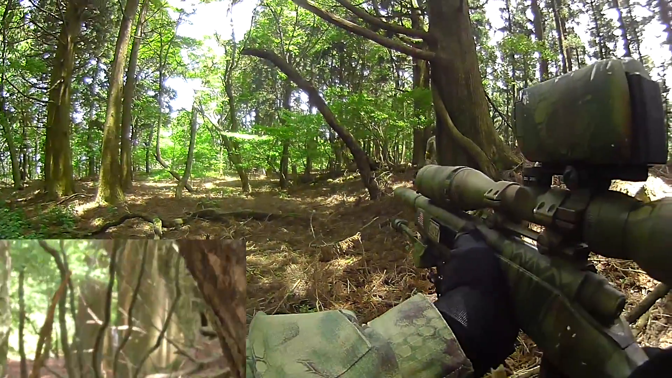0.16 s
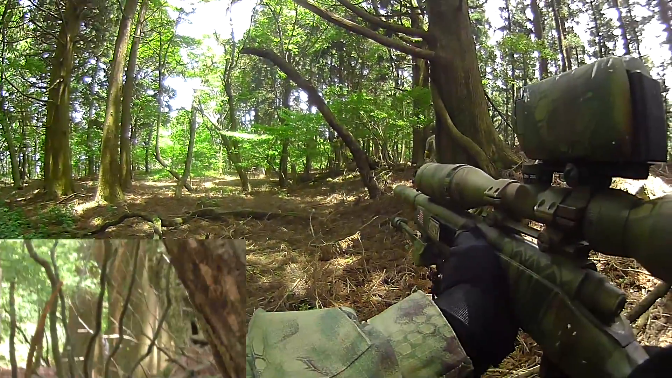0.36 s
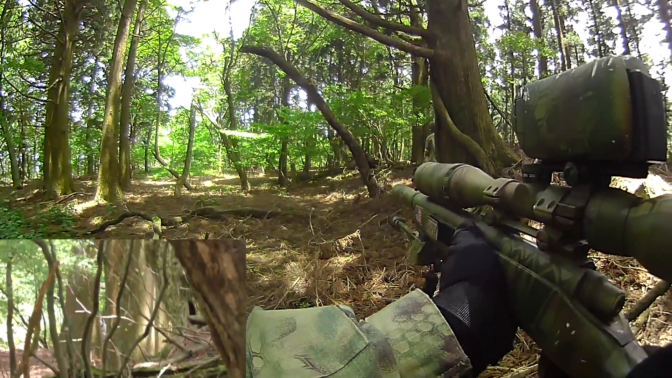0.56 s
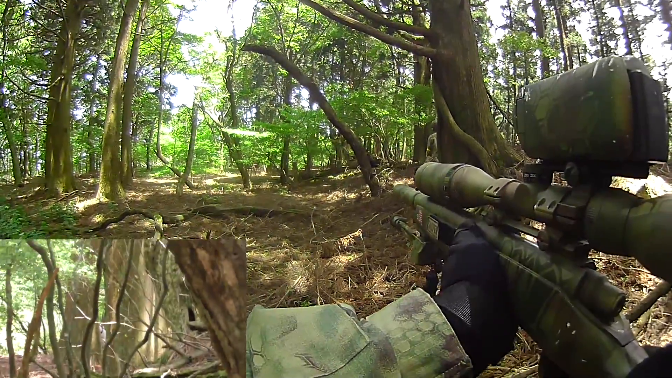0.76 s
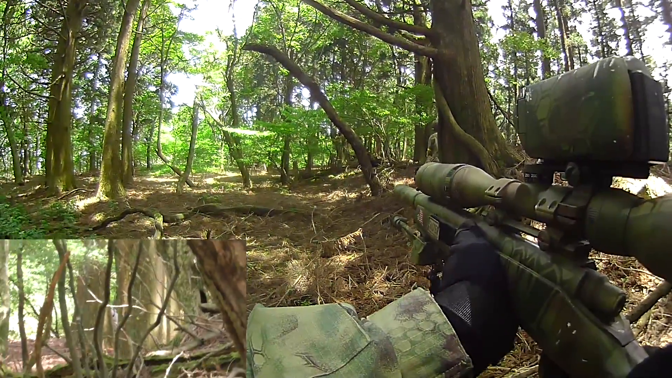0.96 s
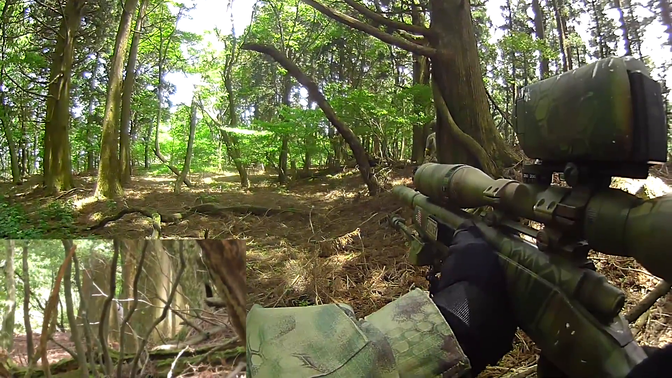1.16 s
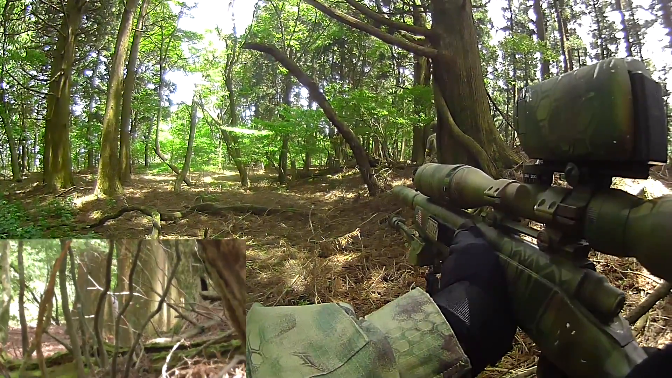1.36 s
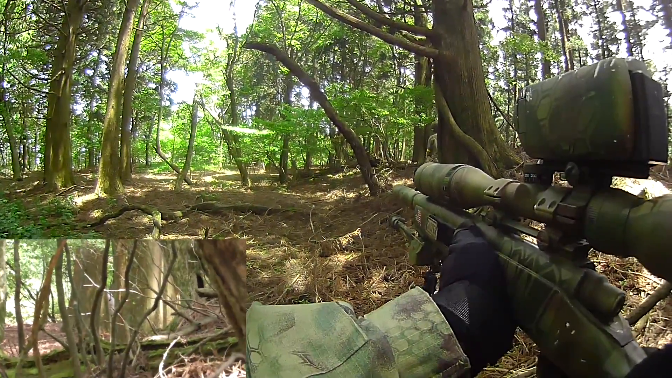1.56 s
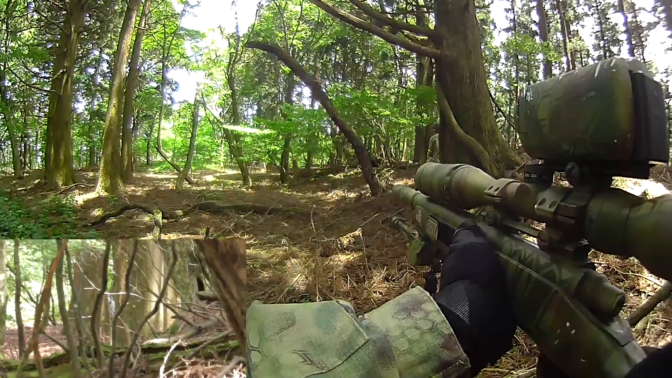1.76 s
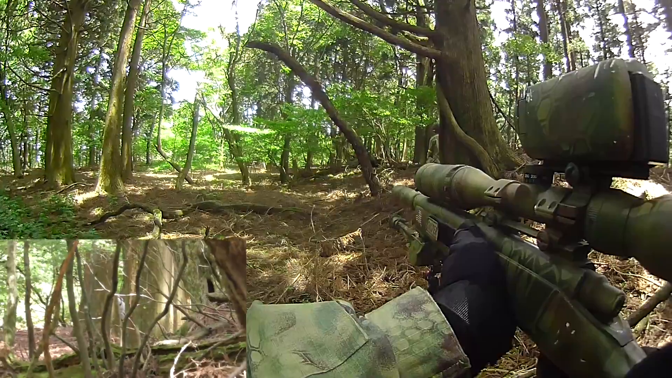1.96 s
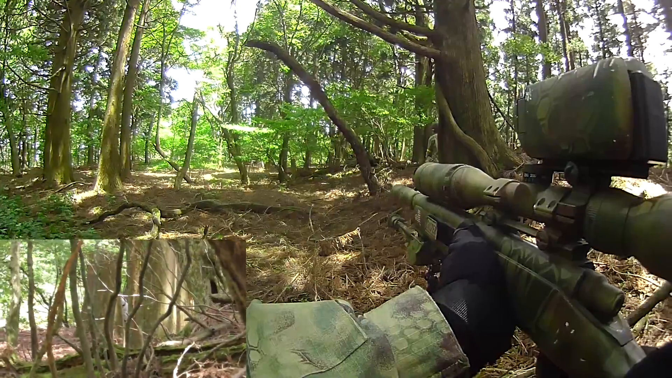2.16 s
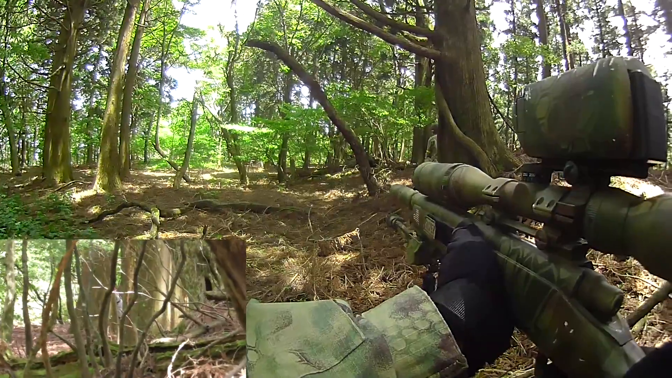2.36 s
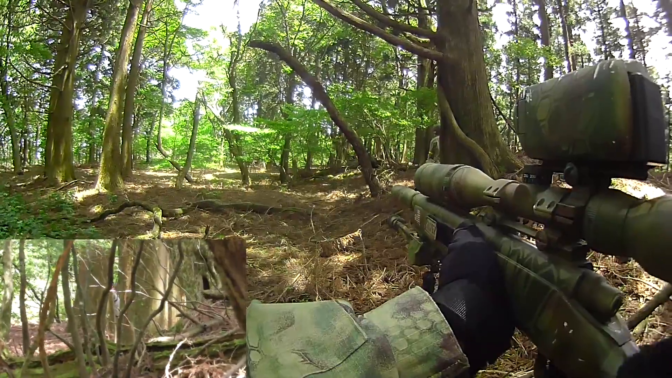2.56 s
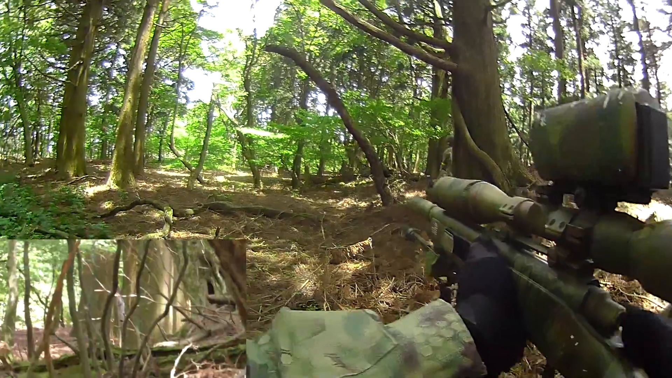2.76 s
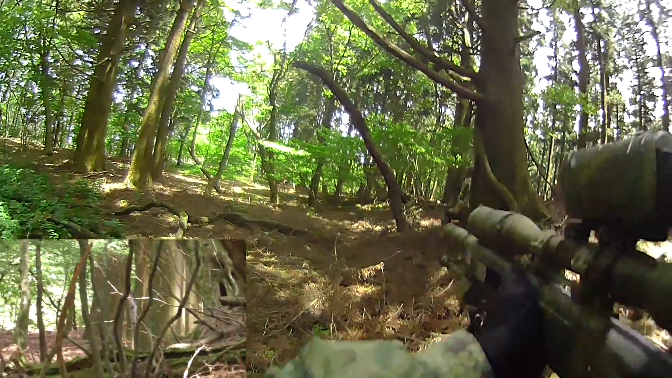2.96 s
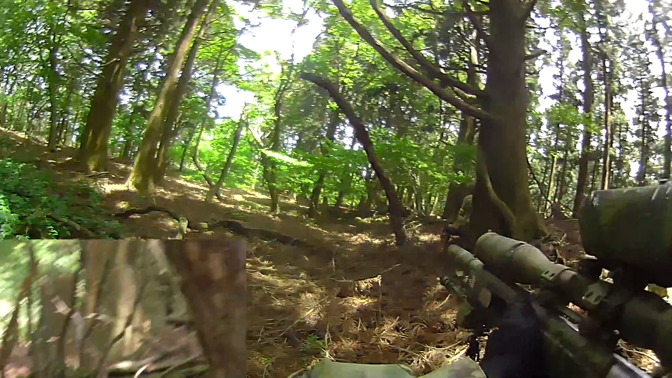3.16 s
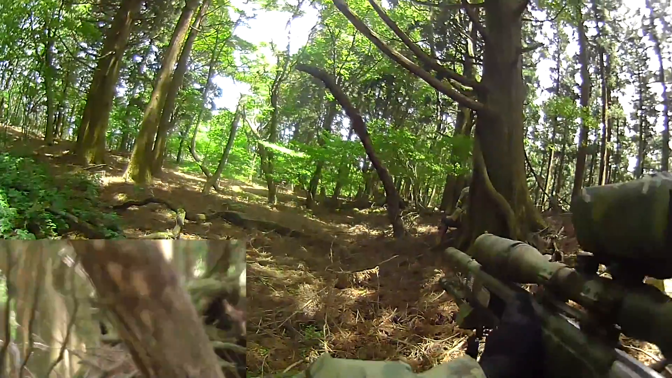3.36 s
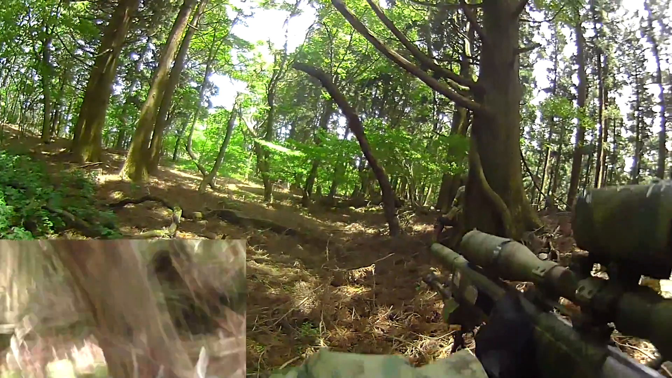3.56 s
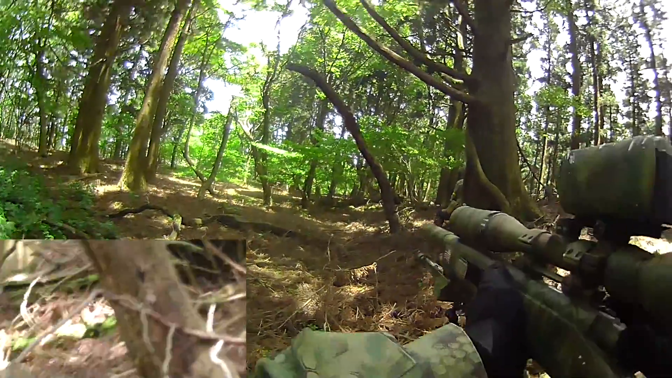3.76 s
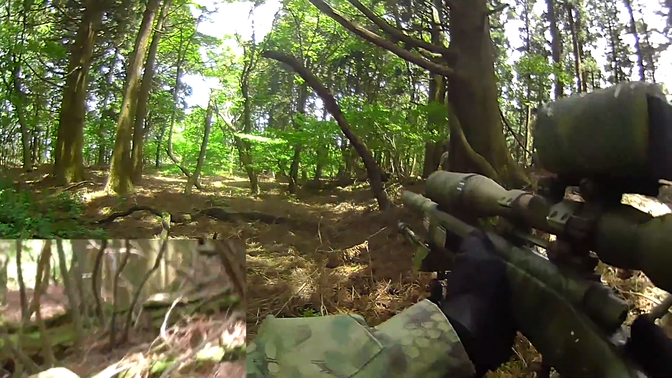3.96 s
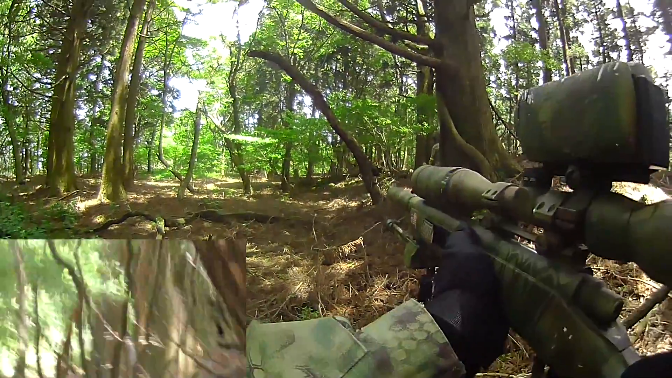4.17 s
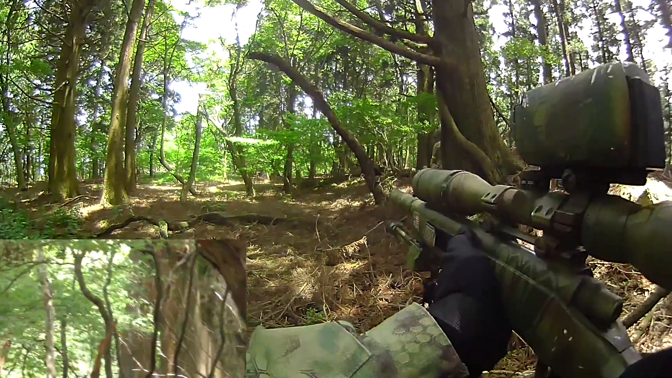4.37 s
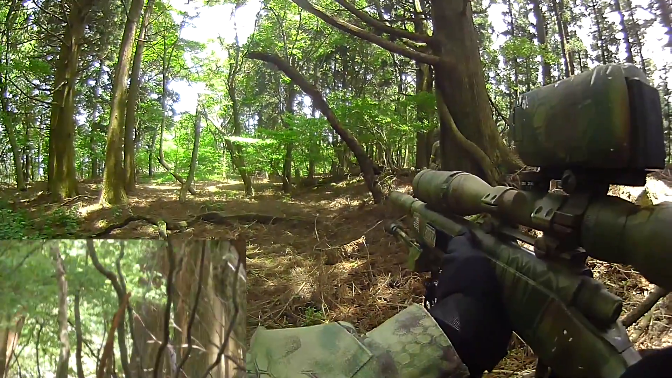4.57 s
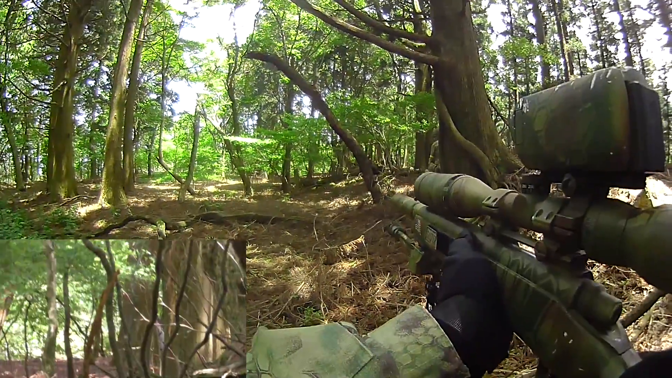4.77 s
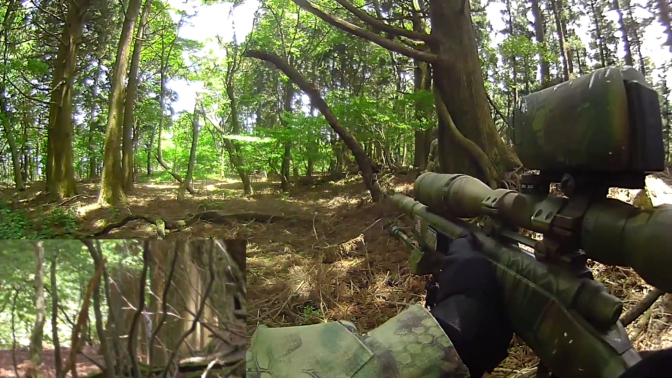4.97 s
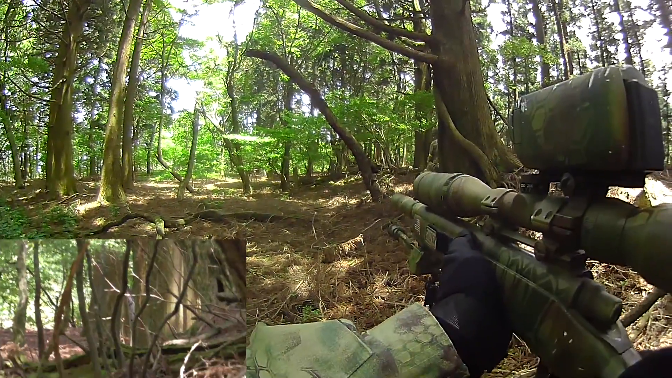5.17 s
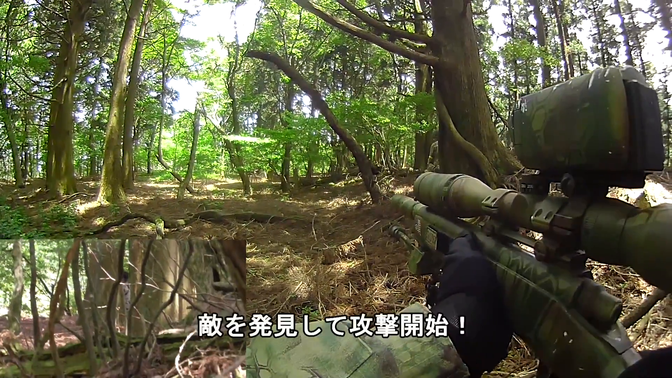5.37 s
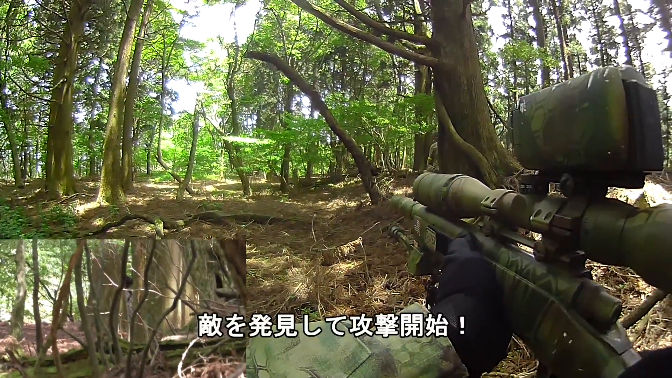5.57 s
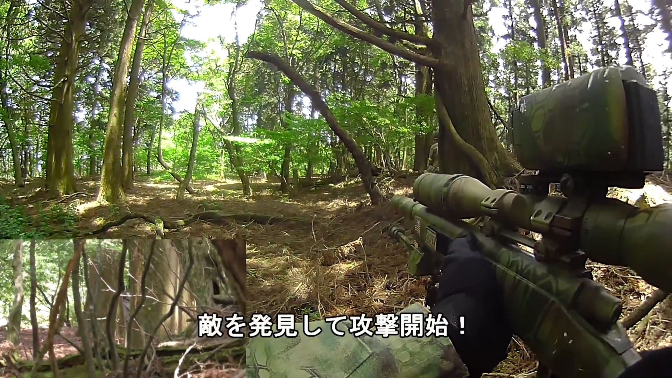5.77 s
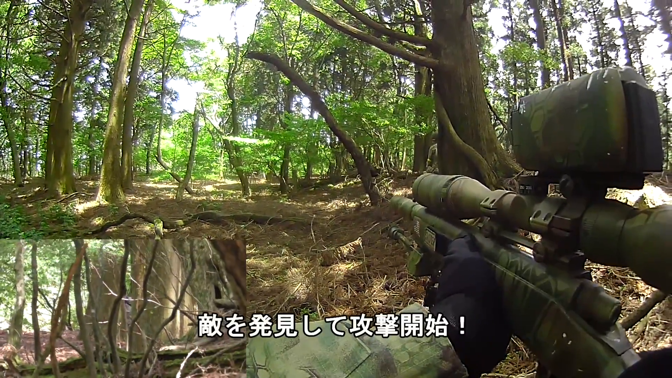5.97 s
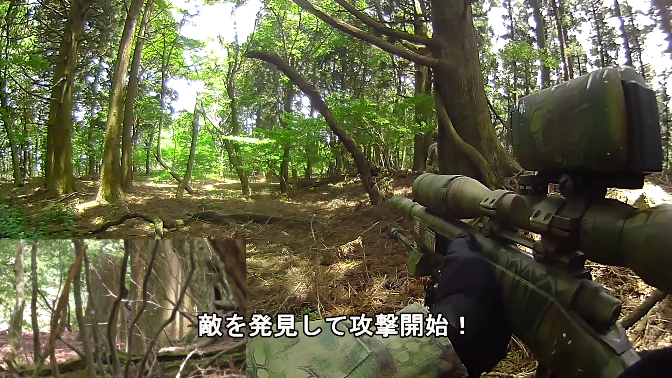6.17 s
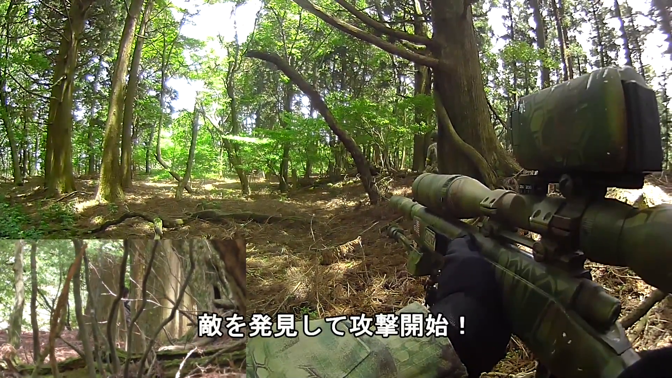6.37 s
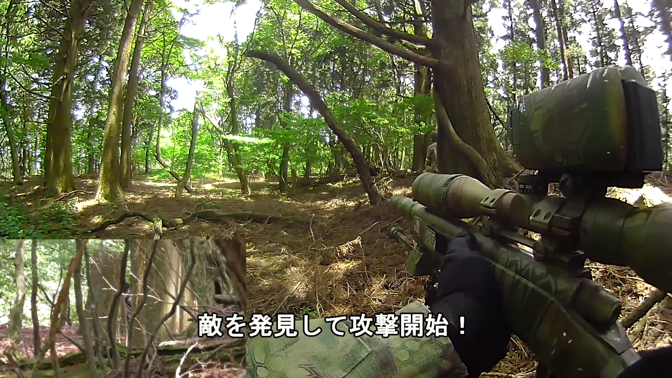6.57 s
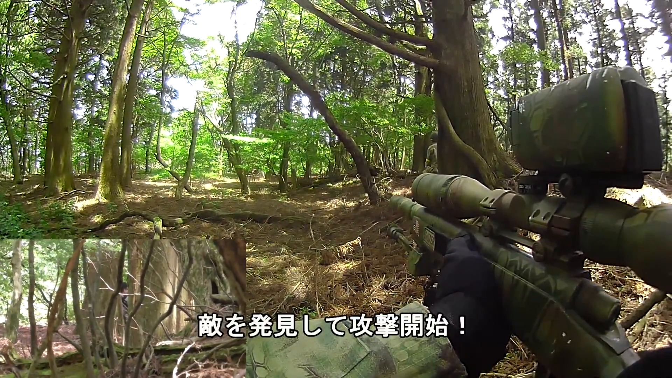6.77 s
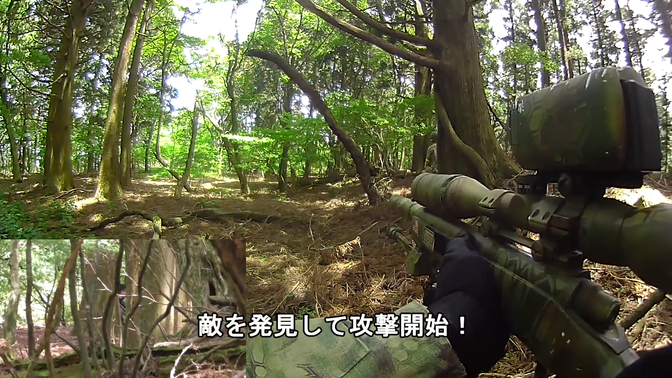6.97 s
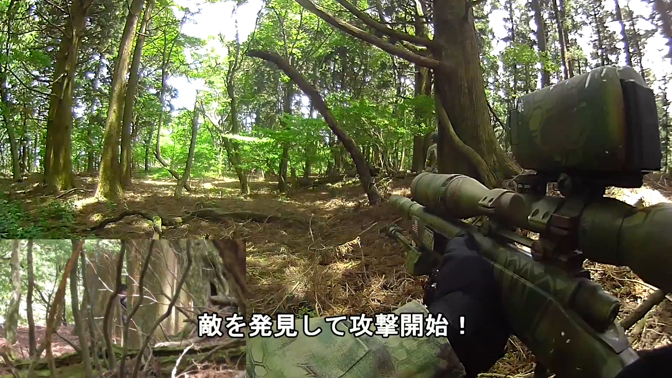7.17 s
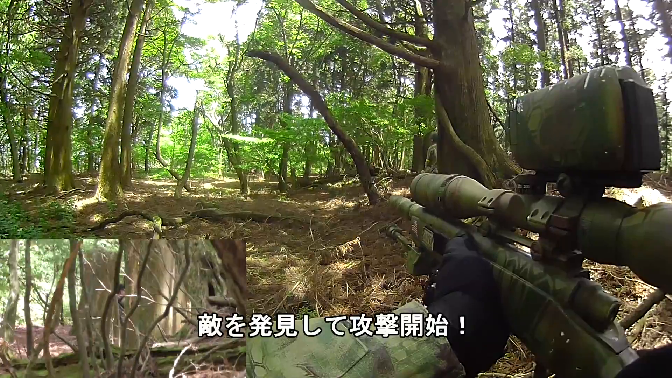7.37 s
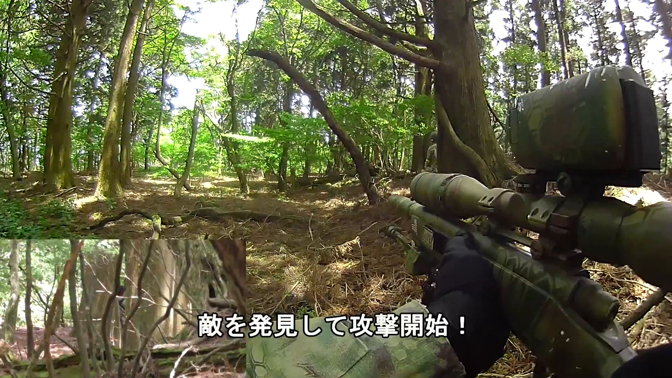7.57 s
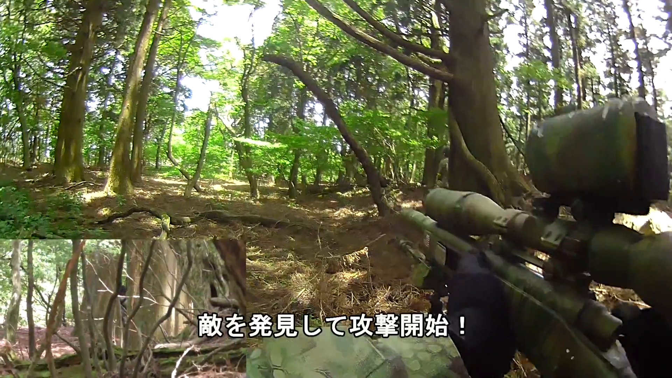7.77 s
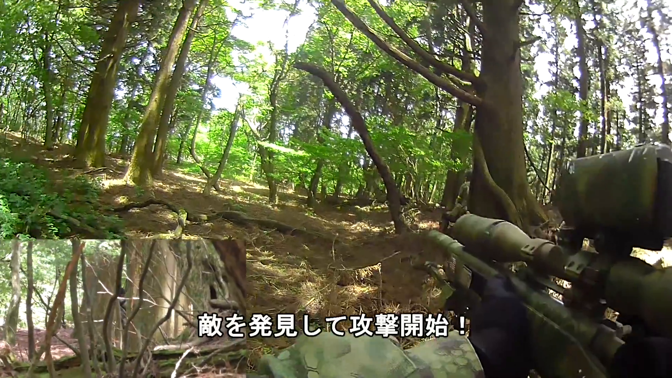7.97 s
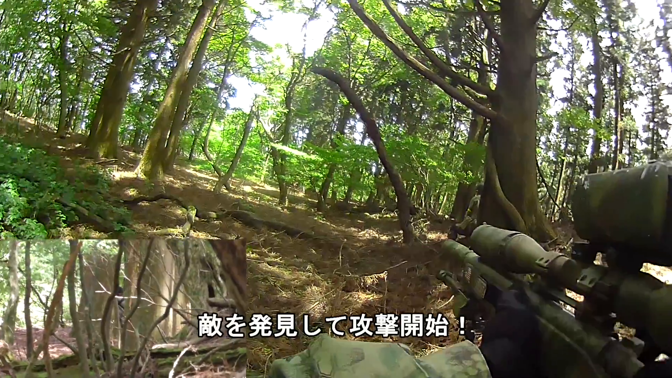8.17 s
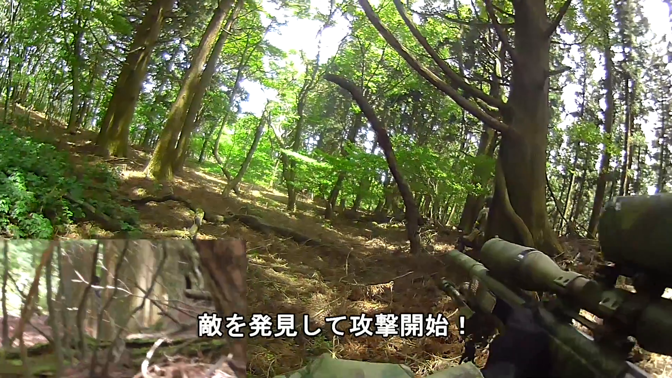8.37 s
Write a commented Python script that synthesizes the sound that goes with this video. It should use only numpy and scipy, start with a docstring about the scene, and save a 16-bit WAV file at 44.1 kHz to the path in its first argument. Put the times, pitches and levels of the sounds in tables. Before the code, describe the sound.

A quiet forest with soft hiss, leafy murmur and low wind bumping a small microphone very close to the rifle. Two dry ticks come around 0.2 s, then a bird whistles rapid sliding notes from about 0.5 to 2.2 s. At 2.3 s a spring-driven rifle fires, a hard, bright, short crack with a low knock, faint spring ring and tree echo; the background ducks. From 2.6 to 3.7 s the bolt is lifted, drawn and pushed home in clacks and gritty scrapes, amid handling rustle. Two faint chirps follow near 3.8 s. Irregular dry snaps run from 4.5 to 5.0 s and 5.4 to 6.9 s, strongest near 5.95 s, while a thin high tone swells around 6.65 s. A second shot cracks at 6.9 s, with tiny ticks after it. From 7.6 s the bolt clicks and scrapes again, ending with a firm clack near 8.35 s.

```python
"""A forest: a spring-driven bolt rifle fires twice close to a small camera; its bolt is lifted, drawn, pushed
home. Rifle and dry snaps are struck resonances, short body rings are decaying sines, bolt strokes are lumpy
scrape noise. A bird sings in gliding sines, the spring rings faintly, a thin tone swells, wind bumps the
microphone. Murmur, rustle and hiss are shaped noise; murmur and rustle are swelled by handling noise while the
bolt is worked. This background sinks at set times around the loud blows and climbs back; near and far trees
echo."""
import sys
import numpy as np
from scipy import signal
from scipy.fft import rfft, irfft, next_fast_len
from scipy.io import wavfile
from scipy.ndimage import uniform_filter1d, map_coordinates

SR = 44100
rng = np.random.default_rng(int(sys.argv[2]) if len(sys.argv) > 2 else 0)


def generate_wav(sig):
    """Save sig (samples, or channels by samples) to the path in sys.argv[1] as 16-bit PCM at SR."""
    pcm = np.round(np.clip(np.atleast_2d(sig).T, -1, 1) * 32767).astype(np.int16)
    wavfile.write(sys.argv[1], SR, pcm)


N = 371542

# Spectra, relative: freq_hz, density_db
HISS_SPECTRUM = [(1500, -37.5), (5000, 6.5), (14500, 2), (16000, -4.5)]
FOREST_SPECTRUM = [(120, -14.5), (200, -9.5), (473, -1.5), (621, -5), (708, -6), (967, -8.5), (2200, -13),
                   (2440, -16), (4500, -27), (5850, -62.5), (9900, -120)]
RUSTLE_SPECTRUM = [(2060, -9.5), (3500, -6), (5220, -5.5), (6260, 2.5), (7930, -17.5), (9000, -31),
                   (11700, -56.5), (19800, -120)]
WIND_SPECTRUM = [(15, -64), (25, -27), (81, 1.5), (118, -4), (156, 2.5), (232, -7.5), (400, -13.5),
                 (520, -25), (880, -120)]
SCRAPE_SPECTRUM = [(710, -26), (1200, -2.5), (4000, -9), (6300, 1), (7740, -15), (9110, -38.5),
                   (13900, -31.5), (16000, -37)]
# Resonances, for one pass: center_hz, width_hz, gain_db
STOCK_MODES = [(300, 280, -2.5), (647, 534, 4.5), (1000, 755, 2.5)]
ACTION_MODES = [(1640, 730, -2.5), (2460, 860, 2.5), (3450, 2430, -0.5)]
# The camera's bright cavity: center_hz, width_hz, gain_db
CAVITY_MODES = [(4850, 1260, 11), (6220, 1060, 16), (7530, 1330, 10)]
SIZZLE_MODES = [(8600, 5000, -2), (13000, 4000, 6), (15000, 1500, 0)]
SNAP_BODY_MODES = [(2300, 2050, 0.5), (4020, 2300, 4.5)]
# Echo of the near trees, then of the far trees: freq_hz, t60_s
NEAR_TREES = [(300, 0.32), (3000, 0.22), (6500, 0.15), (10000, 0.017)]
FAR_TREES = [(3000, .7), (7000, 0.73)]
# Background sinking: bottom_s, depth_db, return_db_per_s
DIPS = [(2.321, 27, 27.5), (2.79, 15.5, 39), (3.0, 12, 8), (3.39, 15.5, 15), (3.709, 27, 13.5),
        (6.93, 28, 29.5), (7.67, 10.5, 17), (8.36, 15, 18)]
# Forest murmur and rustle, swelled by handling noise while the bolt is worked: time_s, forest_db, rustle_db
MURMUR_LEVELS = [(0.04, -49, -54), (1.0, -51, -58.5), (2.45, -51.5, -58), (2.62, -43, -42.5),
                 (2.91, -38, -48), (3.15, -38.5, -43), (3.44, -42, -46), (3.8, -38.5, -38.5),
                 (4.2, -43, -44.5), (4.48, -44, -47), (4.65, -42.5, -41.5), (4.95, -41.5, -37),
                 (5.3, -43, -47), (5.8, -50, -51), (6.3, -49.5, -47), (6.85, -49, -48), (7.3, -48, -44.5),
                 (7.55, -46.5, -50), (7.9, -40, -39.5), (8.4, -45.5, -43.5)]
# Wind bumps on the microphone: peak_s, level_db, slope_db_per_s (both sides)
GUSTS = [(0.015, -41, 300), (.14, -41.5, 300), (.235, -37.5, 300), (.49, -44.5, 400), (.65, -42, 300),
         (.89, -49, 152), (1.31, -46, 300), (1.51, -38, 350), (1.6, -51, 300), (1.7, -33, 257),
         (1.85, -31, 150), (2.1, -52, 153), (2.96, -50.5, 39.5), (3.69, -42, 499.5), (4.2, -52.5, 148),
         (4.82, -52, 201), (5.401, -52.5, 120), (5.9, -40.5, 250), (6.12, -35, 400), (6.79, -36.5, 207),
         (6.9, -43.5, 308), (7.36, -59.5, 198.5), (7.97, -45.5, 204), (8.12, -34.5, 250)]
# Thin tone: time_s, pitch_hz, level_db, unsteadiness (share of TONE_SCATTER_HZ)
THIN_TONE = [(4.7, 2200, -58, 0.89), (6.15, 2195, -54, 0.87), (6.3, 2200, -54, 0.1),
             (6.65, 2190, -41, 0.05), (6.69, 2150, -55, .5), (6.87, 2050, -46.5, 1.17)]
# Gliding sines of bird and spring: start_s, length_s, start_hz, end_hz, level_db (before level wobble)
GLIDES = [(0.507, 0.093, 4550, 4370, -51.5), (0.605, 0.07, 4430, 4200, -58),
          (0.655, 0.076, 5170, 5150, -55), (0.761, 0.024, 4520, 4500, -42.5),
          (0.858, 0.04, 6530, 6760, -50), (0.906, 0.15, 6850, 6840, -59), (0.968, 0.08, 6600, 6740, -55),
          (1.067, 0.092, 5690, 6020, -49), (1.11, 0.07, 5830, 4000, -47.5),
          (1.231, 0.049, 3614, 3400, -48.5), (1.339, .05, 5750, 3970, -51.5),
          (1.392, 0.035, 4390, 4660, -46.5), (1.464, 0.042, 5900, 6330, -43.5),
          (1.552, 0.045, 5810, 4210, -50), (1.609, 0.039, 4570, 4670, -48.5),
          (1.684, 0.034, 6100, 5910, -43), (1.78, 0.037, 4050, 3630, -49.5),
          (1.834, 0.043, 5520, 5380, -48), (1.899, 0.052, 5230, 4010, -47.5),
          (2.034, 0.041, 3740, 3510, -50), (2.195, 0.077, 7800, 6640, -58.5),
          (2.378, 0.57, 3480, 3530, -68.5), (3.79, 0.041, 5000, 4400, -61),
          (3.865, 0.049, 5000, 5010, -61.5), (2.385, 0.064, 2750, 2750, -66)]
# Faint spring ring after the first shot; the other rows are bird notes
SPRING_RING = [row for row in GLIDES if 2.3 < row[0] < 2.4]
BIRD_NOTES = [row for row in GLIDES if not 2.3 < row[0] < 2.4]
# Short rings of the body, low thuds to brighter rings: start_s, level_db (before the attack), pitch_hz
BODY_RINGS = [(0.211, -27.5, 480), (0.233, -28.5, 466), (.437, -32, 450), (0.642, -28, 458),
              (1.688, -20.5, 250), (1.977, -33, 477), (2.311, -16, 718), (2.797, -24, 1656),
              (3.03, -30, 1010), (3.105, -23, 476), (3.4, -34, 996), (3.69, -29, 638), (6.914, -15, 609),
              (7.649, -23.5, 1610), (7.809, -32, 1210), (7.966, -23.5, 276), (8.347, -22, 900)]
# Dry snaps: start_s, level_db (before the drive gain), body_db (re level)
SNAPS = [(0.2151, -38, -1), (0.2276, -31.5, -7.5), (4.026, -37.5, -35), (4.5435, -38, -1),
         (4.5977, -35, -15), (4.7043, -23, -42.5), (4.7545, -28.5, -0.5), (4.845, -37, 2.5),
         (4.8839, -21.5, -19), (4.9633, -26.5, -5.5), (5.0115, -29, -3), (5.3992, -39, 10), (5.62, -44, 1),
         (5.677, -33, -6), (5.7012, -31, -2), (5.8407, -23, -21), (5.9005, -25, -5.5), (5.9457, -13, -22),
         (5.9755, -41, 4), (6.008, -36, -6), (6.2318, -24, -21), (6.3623, -23, 1), (6.4132, -18, -17),
         (6.4619, -19.5, -5.5), (6.6463, -28, 6.5), (6.8439, -25, 3), (6.8505, -20.5, -9),
         (7.1166, -52.5, 7), (7.201, -44, -2), (7.226, -39.5, -2), (7.297, -46.5, 3.5)]
# Bolt strokes: start_s, attack_s, hold_s, release_s, level_db, stock_db (re scrape)
STROKES = [(2.555, 0.01, .02, .02, -46, -11.5), (2.918, 0.025, 0.045, 0.032, -23, -10),
           (3.013, 0.029, 0.035, 0.069, -42.5, -4), (3.205, 0.038, 0.0032, 0.024, -31.5, -4),
           (3.324, 0.023, .028, 0.014, -21.5, -12.5), (3.529, 0.022, .003, .04, -32.5, -4.5),
           (3.591, .015, 0.048, 0.018, -34.5, -13), (3.655, 0.024, 0.0098, 0.022, -21.5, -14.5),
           (7.585, 0.033, 0.06, 0.033, -44, -14), (7.938, .03, 0.048, 0.09, -42, -11),
           (8.124, 0.029, 0.0096, 0.018, -19.5, -7), (8.209, 0.051, .083, 0.021, -22, -9.5)]
# Shots: start_s, level_db (offset for all contacts of the shot)
SHOTS = [(2.2991, -4), (6.9002, -5)]
# One shot, sear's tick to piston's last bounce: delay_s, cavity_db, stock_db, sizzle_db (last two re cavity)
SHOT_CONTACTS = [(-.006, -22.5, 8, -19.5), (0.0003, 3, -13.5, -9.5), (.003, -2.5, -20, -11.5),
                 (.0095, -4.5, -21, -22.5), (0.017, -4.5, -21, -27.5), (.0225, -10.5, -17, -30.5),
                 (0.0267, -10.5, -13, -25.5), (.034, -16, -19.5, -30.5), (.043, -20, -25, -29)]
# Bolt and handle contacts: start_s, cavity_db, stock_db, sizzle_db (last two re cavity, all before trims)
BOLT_CONTACTS = [(2.5705, -24, -16.5, -42), (2.6285, -24, -18, -39), (2.6389, -36, -22, -39),
                 (2.686, -27.5, -10, -48), (2.764, -34, -5, -30), (2.77, -12.5, -3, -17),
                 (2.7948, -11.5, -17, -35), (2.8031, -20.5, -15, -33), (2.8374, -14.5, -9, -36),
                 (2.869, -18.5, -15, -10), (2.878, -24, -9.5, -28), (2.9482, -15, -1, -33),
                 (2.964, -18, -8, -24), (2.9737, -13, -15, -24.5), (3.029, -26, 5.5, -30),
                 (3.071, -38, 10, -35), (3.2481, -24.5, 5, -37), (3.3662, -10, -14.5, -11.5),
                 (3.399, -34, 5.5, -27), (3.4631, -41.5, 2, -33), (3.511, -44.5, 3, -35),
                 (3.5587, -5.5, -21.5, -12.5), (3.6749, -7, -24, -27.5), (3.6849, -11, -16.5, -4),
                 (3.767, -49, 2, -35), (3.849, -30, -13, -39), (3.857, -20.5, -5.5, -39),
                 (3.938, -54, 10.5, -37), (4.046, -47.5, -3, -35), (7.6123, -28.5, -17, -37),
                 (7.62, -34, -10, -37), (7.6364, -15.5, -20, -40), (7.6473, -9, -19, -46),
                 (7.6544, -16, -17, -48), (7.6652, -10.5, -17, -21), (7.6982, -29, -6, -39),
                 (7.7167, -29, -10, -42), (7.7275, -26.5, -12, -41), (7.734, -35, -7, -41),
                 (7.803, -31.5, -8, -41), (7.8062, -26, -3, -46), (7.8533, -29.5, -6, -35),
                 (7.8797, -20.5, -11.5, -41), (7.886, -29, -12, -41), (7.9632, -24.5, -11, -38),
                 (8.147, -19, 4, -26), (8.1564, -16.5, 1.5, -16), (8.172, -27, -10, -10),
                 (8.2104, -19.5, -1, -42), (8.346, -11, -3, -11), (8.3874, -37.5, -14, -34)]
# Top roll-off: freq_hz, gain_db
TOP_ROLLOFF = [(15500, -0.5), (16400, -20.5)]

SINK_S = 0.015
HISS_DB, BREEZE_DB = -59, -55.5
TONE_SCATTER_HZ, GLIDE_QUIVER_HZ = 170, 45
BEND = 1.1  # glide exponent: steepest at the start
BODY_RING_T60_S, CONTACT_T60_S, SHOT_T60_S = 0.053, 0.015, 0.014
SWELL_DB = 23  # rise and fall of a stroke
ACTION_DB, ACTION_FOLLOWS = -2, 0.31  # action re cavity before trims; dB per dB of stock
CAVITY_TOP_HZ, BAND_LIMIT_HZ = 8000, 16900


def amp(db):
    """Gain of a level in dB."""
    return 10 ** (np.asarray(db) / 20)


def unit(x):
    """x at rms 1."""
    return x / np.sqrt(np.mean(x ** 2) + 1e-20)


def along(points, hz):
    """Interpolate (freq_hz, value) points on a log frequency axis."""
    point_hz, values = np.transpose(points)
    return np.interp(np.log(hz + 1), np.log(point_hz + 1), values)


def curves(rows):
    """One value per sample for each column after the time."""
    time_s, *columns = np.transpose(rows)
    return [np.interp(np.arange(N) / SR, time_s, column) for column in columns]


def gate(rows, fade_s=0.0037):
    """1 inside the table's time span, fading at both ends."""
    first_s, last_s = rows[0][0], rows[-1][0]
    knots_s = [first_s - fade_s, first_s, last_s, last_s + fade_s]
    return np.interp(np.arange(N) / SR, knots_s, [0, 1, 1, 0])


def wobble(rate_hz):
    """Smooth random curve, rate_hz knots a second."""
    knots = rng.standard_normal(int(N * rate_hz / SR) + 4)
    return map_coordinates(knots, [np.arange(N) * rate_hz / SR])


def filtered(x, response):
    """x times a complex response of frequency."""
    size = next_fast_len(N + SR // 2)
    return irfft(rfft(x, size) * response(np.fft.rfftfreq(size, 1 / SR)), size)[..., :N]


def resonant(x, modes, order=1):
    """Causal resonances of alternating sign, passed order times, keeping white-noise power."""
    def response(f):
        h = 0
        for k, (center, width, db) in enumerate(modes):
            damping = 1j * f * width
            h = h + (-1) ** k * amp(db) * damping / (center * center - f * f + damping)
        h = h ** order
        return h / np.sqrt(np.mean(abs(h) ** 2))
    return filtered(x, response)


def rush(spectrum, side_db, lumps=1.):
    """Nearly mono stereo noise of rms 1, its grain set by lumps."""
    noise = rng.standard_normal((2, N)) * lumps
    mid, side = filtered(noise, lambda hz: amp(along(spectrum, hz)))
    side = amp(side_db) * side
    return unit(np.array([mid + side, mid - side]))


def bursts(starts_s, levels_db, t60_s, rise_s):
    """Dying noise bursts, one row of output for each column of levels."""
    t = np.arange(4096) / SR
    out = np.zeros((levels_db.shape[1], N + len(t)))
    noise = rng.standard_normal((len(starts_s), len(t)))
    for start_s, db, fall_s, grain in zip(starts_s, levels_db, t60_s, noise):
        shape = amp(-60 * t / fall_s) * (1 - np.exp(-t / rise_s)) ** 2
        burst = grain * shape
        burst *= np.linalg.norm(shape) / np.linalg.norm(burst) / shape.max()  # same energy for every draw
        i = round(start_s * SR)
        out[:, i:i + len(t)] += amp(db)[:, None] * burst
    return out[:, :N]


def glides(rows):
    """Gliding sines, slightly hoarse from random quiver in pitch and level."""
    out, quiver_hz = np.zeros(N), GLIDE_QUIVER_HZ * wobble(150)
    for start_s, length_s, start_hz, end_hz, db in rows:
        i, n = round(start_s * SR), round(length_s * SR)
        u = np.arange(n) / n
        glide_hz = start_hz + (end_hz - start_hz) * (1 - (1 - u) ** BEND)
        phase = 2 * np.pi * np.cumsum(glide_hz + quiver_hz[i:i + n]) / SR
        out[i:i + n] += amp(db) * np.sqrt(np.sin(np.pi * u)) * np.sin(phase)
    return out * amp(3.4 * wobble(60))


def sinking():
    """Background gain: a quick drop at each dip, a steady climb back in dB; the deepest dip rules."""
    t = np.arange(N) / SR
    dips_db = [np.interp(t, [s - SINK_S, s, s + depth / climb], [0, -depth, 0]) for s, depth, climb in DIPS]
    return amp(np.min(dips_db, axis=0))


def background():
    """Hiss, forest murmur, crackly rustle and lumpy breeze all sink; wind bumps on the microphone do not."""
    forest_db, rustle_db = curves(MURMUR_LEVELS)
    t = np.arange(N) / SR
    hiss = amp(HISS_DB) * rush(HISS_SPECTRUM, side_db=-8.0)
    forest = amp(forest_db + 1.3 * wobble(13)) * rush(FOREST_SPECTRUM, side_db=-9.0)
    crackle = amp(1.8 * wobble(300))
    rustle = amp(rustle_db + 0.86 * wobble(25)) * rush(RUSTLE_SPECTRUM, side_db=-21.0, lumps=crackle)
    breeze_lumps = amp(1.9 * wobble(30) + 2.3 * wobble(11))
    breeze = amp(BREEZE_DB) * rush(WIND_SPECTRUM, side_db=-20, lumps=breeze_lumps)
    push = rush(WIND_SPECTRUM, side_db=-23)
    push = push / np.sqrt(abs(uniform_filter1d(push[0] ** 2, size=1500)) + .1)  # evens out local strength
    gusts = sum(amp(db - slope * abs(t - s)) for s, db, slope in GUSTS)
    return sinking() * (hiss + forest + rustle + breeze) + push * gusts


def tone():
    """Sine whose fast pitch scatter smears it, gathers it into a line and smears it again at the end."""
    hz, db, unsteady = curves(THIN_TONE)
    pitch_hz = hz + TONE_SCATTER_HZ * unsteady * wobble(250)
    level = gate(THIN_TONE) * amp(db + 2.0 * wobble(20))
    return level * np.sin(2 * np.pi * np.cumsum(pitch_hz) / SR)


def bird():
    """Whistled notes and slurs: each a sine gliding from one pitch to another."""
    return glides(BIRD_NOTES)


def spring():
    """Faint spring ring after the first shot: two nearly level sines."""
    return glides(SPRING_RING)


def body_rings():
    """Short rings of the body, low thuds to brighter rings: one decaying sine each."""
    out, t = np.zeros(N + SR), np.arange(SR // 5) / SR
    attack = 1 - np.exp(-t / 0.0013)
    for start_s, db, hz in BODY_RINGS:
        ring = amp(db - 60 * t / BODY_RING_T60_S) * attack * np.sin(2 * np.pi * hz * t)
        out[round(start_s * SR):][:len(t)] += ring
    return out[:N]


def snaps():
    """Single-sample pushes ring the cavity for a few cycles, with a duller body under some."""
    start_s, db, body_db = np.transpose(SNAPS)
    pushes = np.zeros((2, N))
    at = np.round((start_s + .0004) * SR).astype(int)
    pushes[:, at] = amp([db + 14.5, db + body_db + 15])
    cavity = resonant(pushes[0], CAVITY_MODES, order=2)
    return cavity + resonant(pushes[1], SNAP_BODY_MODES, order=2)


def bolt():
    """Steel on steel: a dense run of small catches under each stroke, shaking the stock too."""
    grit = amp(3.2 * wobble(500) + 1.5 * wobble(150))
    scrape = rush(SCRAPE_SPECTRUM, side_db=-21.5, lumps=grit)
    stock = unit(resonant(grit * rng.standard_normal(N), STOCK_MODES, order=2))
    t, out = np.arange(N) / SR, 0
    for *times_s, db, stock_db in STROKES:
        swell_db = np.interp(t, np.cumsum(times_s), [-SWELL_DB, 0, 0, -SWELL_DB], -np.inf, -np.inf)
        out = out + amp(db + swell_db) * (scrape + amp(stock_db) * stock)
    return out


def rifle():
    """Every contact shakes the stock, the action and the camera's cavity in its own proportions."""
    shots = [(s + delay, db + step, stock, sizzle)
             for s, db in SHOTS for delay, step, stock, sizzle in SHOT_CONTACTS]
    start_s, cavity_db, stock_db, sizzle_db = np.transpose(shots + BOLT_CONTACTS)
    t60_s = np.repeat([SHOT_T60_S, CONTACT_T60_S], [len(shots), len(BOLT_CONTACTS)])
    action_db = ACTION_DB + ACTION_FOLLOWS * stock_db
    body_db = np.transpose([cavity_db - 5, cavity_db + stock_db - 4, cavity_db + action_db - 5])
    to_cavity, to_stock, to_action = bursts(start_s, body_db, t60_s, rise_s=0.00096)
    treble_db = (cavity_db + sizzle_db - 3)[:, None]
    to_sizzle, = bursts(start_s, treble_db, 1.03 * t60_s, rise_s=0.000062)
    body = resonant(to_cavity, CAVITY_MODES, order=2) + resonant(to_stock, STOCK_MODES)
    body = body + resonant(to_action, ACTION_MODES, order=2)
    # the housing passes little of the body above its cavity
    wall = signal.butter(4, CAVITY_TOP_HZ, fs=SR, output="sos")
    return signal.sosfilt(wall, body) + resonant(to_sizzle, SIZZLE_MODES, order=2)


def echo(x, decay):
    """Trees answer with a noise tail, each frequency dying at its own speed."""
    hz, t, z = signal.stft(rng.standard_normal((2, SR)), SR, nperseg=256)
    fall = amp(-60 * t / along(decay, hz)[:, None])
    tail = signal.istft(z * fall, SR, nperseg=256)[1]
    tail[1] = 1.1 * tail[0] + 0.33 * tail[1]  # the ports sit close together
    tail = tail / np.linalg.norm(tail, axis=1)[:, None]
    return signal.fftconvolve(x[None], tail, axes=1)[:, :N]


def scene():
    """Rifle and snaps answer from the near trees; bird, spring and, faintly, the rifle from far ones."""
    gun, cracks = rifle(), snaps()
    whistles = amp(1.0) * (bird() + spring())
    close = echo(amp(-21.0) * gun + amp(-9.0) * cracks, NEAR_TREES)
    distant = echo(whistles + amp(-39) * gun, FAR_TREES)
    return background() + tone() + whistles + body_rings() + cracks + bolt() + gun + close + distant


def record(dry):
    """Round off the loudest peaks, roll off the top, keep nothing above the band limit."""
    dry = dry * amp([[-.12], [.12]])  # right port a shade louder
    rounded = dry / (1 + abs(dry / .9) ** 4) ** (1 / 4)
    return filtered(rounded, lambda hz: amp(along(TOP_ROLLOFF, hz)) * (hz < BAND_LIMIT_HZ))


dry = scene()
out = record(dry)
generate_wav(out)
```